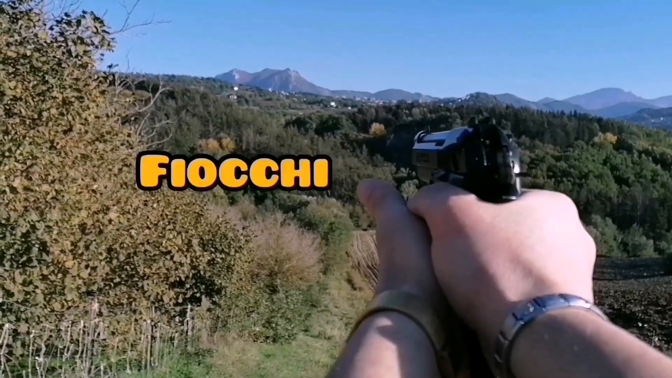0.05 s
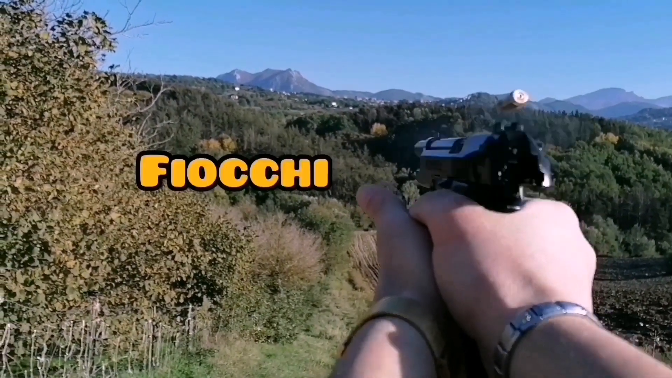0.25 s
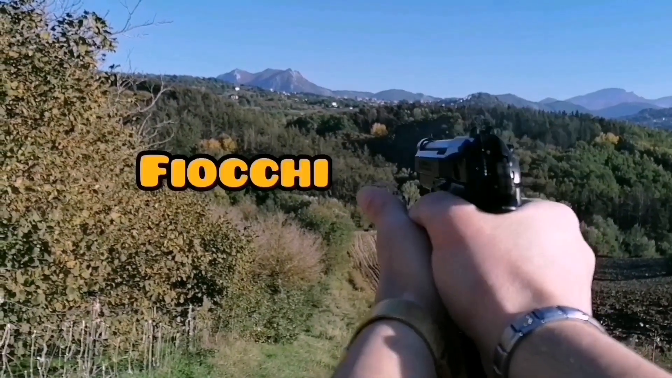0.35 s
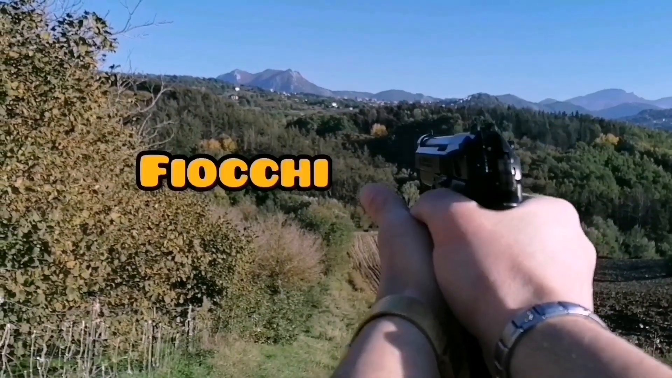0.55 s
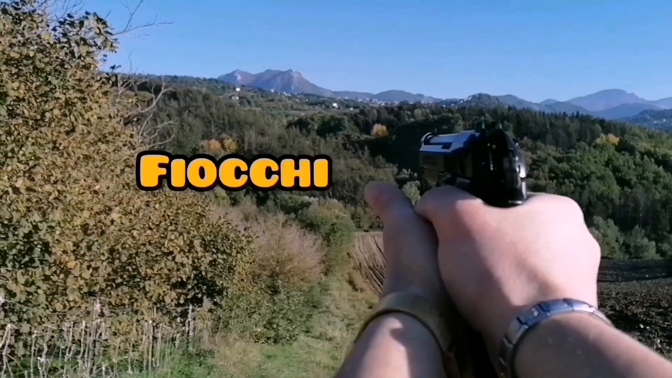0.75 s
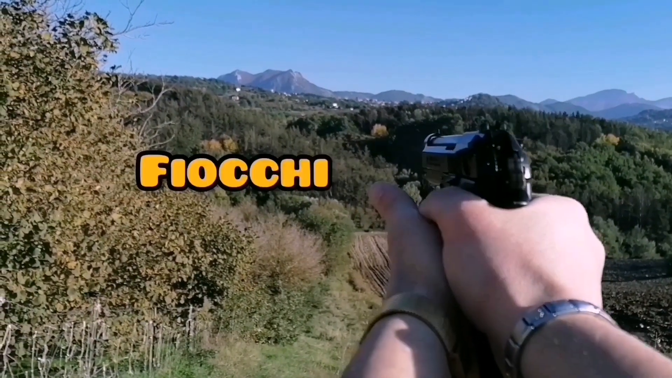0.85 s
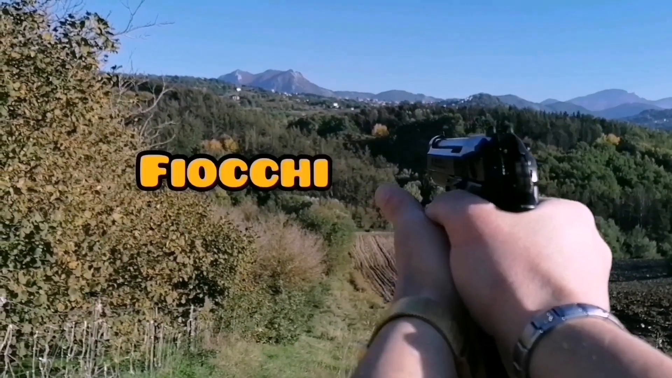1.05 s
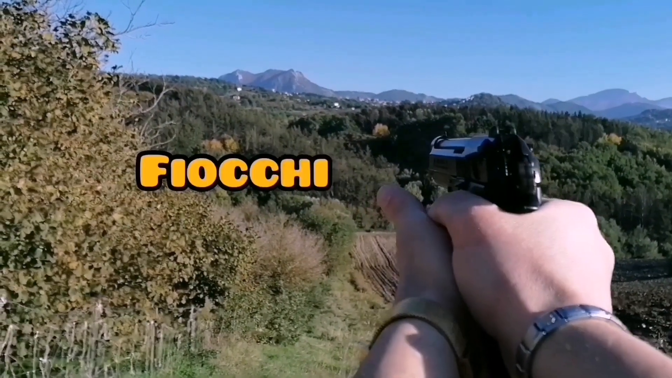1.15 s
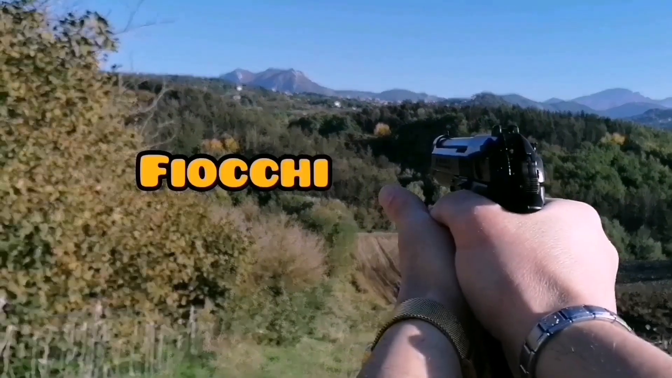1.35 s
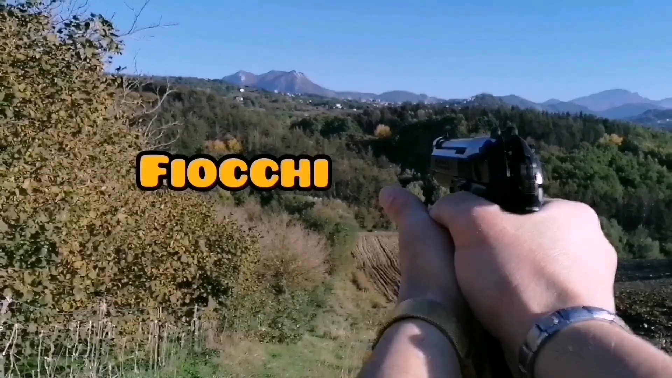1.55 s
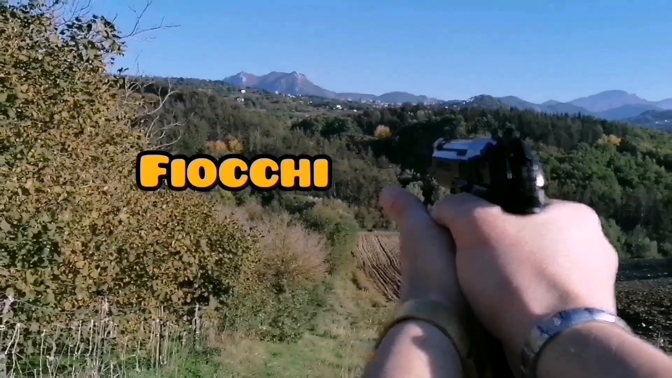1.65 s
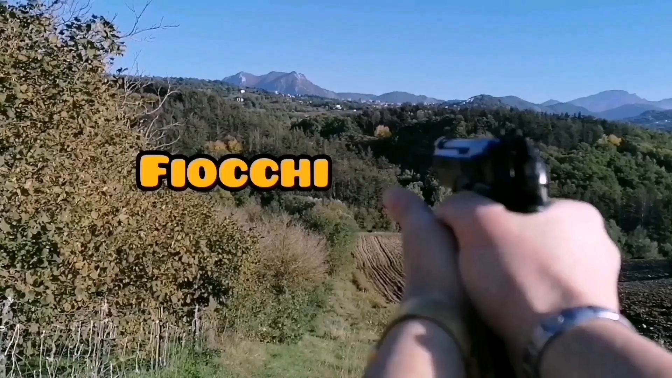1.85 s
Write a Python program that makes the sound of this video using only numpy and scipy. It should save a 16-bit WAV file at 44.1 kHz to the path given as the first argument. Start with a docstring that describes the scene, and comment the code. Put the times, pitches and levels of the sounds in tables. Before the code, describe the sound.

After a brief quiet outdoor hush, a single blank pistol shot bangs close to an overloaded stereo microphone, followed at once by a metal slide clack, fading hillside echoes, and a small case ticking onto stone in grass.

```python
"""A blank pistol is fired once on an open hillside: band-shaped gas noise, low decaying tones and a slow thud,
close to a small stereo recorder that it overloads. The slide rasps and rings; the spent case is a thin
throbbing tone that ends in grass and on a stone. Bushes, trees and slopes return scattered pulses and
echoes, mostly duller with distance; a far ridge begins to answer at the end. Rumble, wind and hum lie under.
"""
import sys
import numpy as np
from scipy import signal
from scipy.io import wavfile

SR = 44100
rng = np.random.default_rng(int(sys.argv[2]) if len(sys.argv) > 2 else 0)


def gain_from_decibels(decibels):
    """Convert decibel values to linear amplitude factors."""
    exponent = np.asarray(decibels, float) / 20
    return 10 ** exponent


def log_audio(samples):
    """Write samples as a 16-bit WAV file to the path given in sys.argv[1]."""
    # one column per channel
    frames = np.atleast_2d(samples).T
    # limit to full scale, then quantise
    limited = np.clip(frames, -1, 1)
    pcm = np.round(limited * 32767).astype(np.int16)
    wavfile.write(sys.argv[1], SR, pcm)


N = 83790
T = np.arange(N) / SR

# Spectrum of the gas roar: frequency_hz, relative_density_db (per Hz)
BLAST_SPECTRUM = [(90, -31), (200, -6), (350, -1.5), (620, -4), (900, -6), (1600, -18), (4000, -20.5),
                  (12000, -30)]
# Left-right correlation of roar and slide: frequency_hz, likeness (-1 to 1)
BLAST_LIKENESS = [(50, 0.37), (90, 0.029), (200, 0.83), (600, 0.61), (1200, 0.067), (4000, 0.076)]
# Low decaying tones that colour the bang: frequency_hz, level_db, t60_s
BOOM_TONES = [(44.9, -3.5, .04), (204, -0.5, 0.18), (350.9, 4.5, 0.096), (618.6, 5.5, .1), (752.7, 2, .1),
              (839.6, 6, 0.11)]
# Spectrum scattered by near bushes: frequency_hz, relative_density_db (per Hz)
BUSH_SPECTRUM = [(1500, -15.5), (3000, -4.5), (5000, -5), (8000, -4.5), (12000, -15), (14500, -45.5)]
# Spectrum of the slide's rasp: frequency_hz, relative_density_db (per Hz)
SLIDE_SPECTRUM = [(1200, -4.5), (2800, -0.5), (4500, -1.5), (7000, -6.5), (11000, -10.5), (15500, -19)]
# Modes of the slide's steel: frequency_hz, level_db, t60_s, left_minus_right_db
SLIDE_MODES = [(3102, -1.5, 0.018, -2), (4036, -3.5, 0.058, 11.5), (5820, -11.5, 0.075, -6.5),
               (6300, -8.5, .05, 4)]
# Modes of the case on the stone: frequency_hz, relative_level_db, t60_s (before the strike envelope),
# left_minus_right_db
LANDING_MODES = [(2970, -4.5, 0.003, -19.5), (4920, -5, .0034, 9), (5420, 0.5, 0.0037, 9.5),
                 (9670, -4, .0042, -4), (10910, -7.5, 0.0026, -17), (12540, -17.5, .0035, 1)]
# Faint ticks nearby: start_s, level_db (before the envelope), centre_hz, left_minus_right_db
TICKS = [(1.143, -44, 8000, 0), (1.355, -50, 6000, 0), (1.722, -46, 5000, 1), (1.8716, -46, 6500, 0)]
# Scattered return: time_s, level_db, air_loss_db (at 8 kHz; below 0 counts as 0), left_minus_right_db
HILLSIDE_RETURN = [(.28, -18.5, -17, 12), (0.308, -11.5, -2, 2.5), (.37, -20, -39, 3), (.44, -23, -6, 3),
                   (.5, -20.5, 10, 2.5), (0.581, -21.5, 5, 0.5), (0.669, -21.5, 19, 1.5),
                   (0.709, -29, 15, 3.5), (0.802, -28, 23, 7), (0.902, -29, 40, 9.5), (0.999, -32.5, 23, 8),
                   (1.099, -32.5, 36.5, 4), (1.22, -30.5, 55.5, 12), (1.32, -40, 38.5, 10.5),
                   (1.48, -41, 58, 11.5), (1.68, -49, 26, 9.5), (1.77, -42, 18.5, 10), (1.9, -33, 24.5, -1)]
# Spectrum of the return before air loss: frequency_hz, relative_density_db (per Hz)
RETURN_SPECTRUM = [(60, -28), (120, -14), (250, -9.5), (450, -5), (800, 2), (1200, 0), (1700, -6),
                   (2600, -12), (3200, -16.5), (6000, -21), (9000, -32), (13500, -49), (15500, -59)]
# Left-right correlation of hillside and bushes: frequency_hz, likeness (-1 to 1)
RETURN_LIKENESS = [(60, .7), (200, .8), (600, .65), (1500, .5), (4000, .3), (12000, .1)]
# Single echoes, and the low knock of the tick at 1.87 s:
# onset_s (one half-width before the peak), envelope_peak_db, pitch_hz, half_width_cycles
ECHOES_AND_KNOCK = [(.306, -25, 95, 1.1), (.320, -7, 826, 1.5), (.365, -27, 155, 1.5),
                    (.377, -14, 750, 1.6), (.385, -30, 125, 1.5), (.411, -21, 840, 2.2),
                    (.455, -17, 1130, 3.0), (.4765, -7, 1140, .9), (.494, -29, 108, 1.5),
                    (.4945, -14, 780, 1.8), (.497, -29, 220, 2.0), (.506, -16, 800, 1.3),
                    (.578, -20, 800, 2.5), (.630, -23, 500, 2.2), (.654, -21.5, 993, 2.2),
                    (.723, -26, 1100, 1.5), (.770, -33, 300, 2.5), (.954, -30, 1030, 2.5),
                    (1.294, -36, 700, 2.2), (1.801, -34, 453, 1.2), (1.813, -36.5, 600, 1.6),
                    (1.824, -32, 440, 1.1), (1.8707, -30.5, 2050, 1.3), (1.8725, -28, 600, 1.4)]
# Spectrum of the far rumble and hiss: frequency_hz, relative_density_db (per Hz)
RUMBLE_SPECTRUM = [(59, -45.5), (100, -19.5), (209, -15), (306, -11), (340, -3), (362, -3.5), (456, -6),
                   (575, -9.5), (995, -5.5), (1910, -21.5), (2460, -24.5), (15400, -45.5)]
# Left-right correlation of the rumble: frequency_hz, likeness (-1 to 1)
RUMBLE_LIKENESS = [(60, 0.89), (240, 0.97), (950, 0.66), (3770, -0.24), (15000, 0.28)]
# Wind on the ports, before its random lumps: time_s, level_db
WIND_LEVEL = [(0.0, -50), (0.12, -53.5), (0.28, -33), (0.36, -49), (1.492, -50), (1.9, -57)]

SHOT_S = .2253
AIR_LOSS_POWER = 0.82   # exponent of frequency in the air's absorption


def lead_hiss():
    """Band-limited noise: a two-sided exponential swells just ahead of the bang and falls just after."""
    efold_s, level_db, band_hz = 0.0015, -0.5, (700, 6000)
    hiss = rms_one(band_pass(rng.standard_normal((2, N)), band_hz))
    return gain_from_decibels(level_db) * hiss * np.exp(-np.abs(T - SHOT_S) / efold_s)


def gas_roar():
    """Turbulent jet noise: the gas leaving the barrel gives a broad spectrum with an exponential decay."""
    level_db, rise_s, t60_s = 11, 0.0011, 0.13
    return gain_from_decibels(level_db) * banded(white(), BLAST_SPECTRUM, BLAST_LIKENESS) * burst(SHOT_S, rise_s, t60_s)


def booms():
    """Additive synthesis: low damped sinusoids all start with the bang."""
    return sum(gain_from_decibels(db) * ring(SHOT_S, hz, t60) for hz, db, t60 in BOOM_TONES)


def ground_thump():
    """Ground response: the earth answers with a slower, low band of noise."""
    band_hz, likeness = (148.4, 360), 0.69
    level_db, rise_s, t60_s = -1, 0.018, 0.25
    return gain_from_decibels(level_db) * partly_alike(band_hz, likeness) * burst(SHOT_S, rise_s, t60_s)


def bushes():
    """Scattering with absorption: near bushes return treble, dulled in the air as the path lengthens."""
    level_db, pan_db = -12, 1.5
    rise_s, t60_s = 0.0042, 0.65   # t60 before air loss
    loss_db_per_s = 34   # at 8 kHz
    loss_db = loss_db_per_s * np.maximum(T - SHOT_S, 0)
    scatter = banded(white(), BUSH_SPECTRUM, RETURN_LIKENESS, loss_db=loss_db)
    return gain_from_decibels(level_db) * scatter * panned(burst(SHOT_S, rise_s, t60_s), pan_db)


def shot():
    """Superposition of the direct blast, the ground's answer and the scatter from the bushes."""
    return lead_hiss() + gas_roar() + booms() + ground_thump() + bushes()


def slide():
    """Friction, then impact: a bright rasp as the slide runs home, and steel modes as it slams shut."""
    start_s, rise_s, hold_s, t60_s, level_db = 0.2455, 0.032, 0.019, 0.13, -1
    hit_s = .276
    rise = np.clip((T - start_s) / rise_s, 0, 1)
    # The fall begins hold_s after the start, while the rise is still under way.
    fall = gain_from_decibels(-60 * np.maximum(T - start_s - hold_s, 0) / t60_s)
    rasp = gain_from_decibels(level_db) * banded(white(), SLIDE_SPECTRUM, BLAST_LIKENESS) * rise * fall
    steel = sum(panned(gain_from_decibels(db) * ring(hit_s, hz, t60), pan_db) for hz, db, t60, pan_db in SLIDE_MODES)
    return rasp + steel


def flying_case():
    """Modulated free vibration: one thin mode throbs as the case tumbles, until the grass damps it."""
    start_s, pitch_hz, level_db, t60_s, pan_db = .3, 5970, -39, 1.05, -8
    throb_db, throb_rate_hz = 3, 30   # random throb: spread and corner frequency
    stop_s, damping_s = .935, 0.018
    tumble = gain_from_decibels(throb_db * drift(throb_rate_hz))
    damping = np.clip((stop_s - T) / damping_s, 0, 1)
    return panned(gain_from_decibels(level_db) * ring(start_s, pitch_hz, t60_s) * tumble * damping, pan_db)


def dry_grass():
    """Friction noise: a flickering band rustles as the case drops through dry grass."""
    start_s, band_hz, likeness = .91, (2836, 4930), 0.33
    level_db, rise_s, t60_s = -52, 0.012, 1.46
    flicker = gain_from_decibels(level_db + 2.0 * drift(40))
    return partly_alike(band_hz, likeness) * burst(start_s, rise_s, t60_s) * flicker


def case_landing():
    """Impact excitation: the case hits a stone and several short modes ring."""
    hit_s, level_db = .97995, -10
    # Squaring softens the onset and halves this envelope's 1 s t60.
    strike = burst(hit_s, 0.00035, 1) ** 2
    return sum(panned(gain_from_decibels(level_db + db) * ring(hit_s, hz, t60) * strike, pan_db)
               for hz, db, t60, pan_db in LANDING_MODES)


def ticks():
    """Transient noise: each faint tick is a short band-limited puff."""
    rise_s, t60_s, half_band_octaves = 0.00058, .015, .6
    out = 0
    for s, db, hz, pan_db in TICKS:
        band_hz = [hz * 2 ** -half_band_octaves, hz * 2 ** half_band_octaves]
        noise = rms_one(band_pass(rng.standard_normal((2, N)), band_hz))
        out = out + noise * panned(gain_from_decibels(db) * burst(s, rise_s, t60_s), pan_db)
    return out


def slope_scatter(level_db, loss_db):
    """Diffuse reflection: thousands of random pulses of uneven size lose treble in the air."""
    pulses_per_s, spread_db, patchy_db = 4000, 3.0, 1.2
    lumps_db, lumps_rate_hz, rise_s = 1.5, 45, .02
    excess_db = spread_db * np.minimum(rng.exponential(1, (2, 2, N)), 5)
    sizes = gain_from_decibels(excess_db) * rng.choice([-1, 1], (2, 2, N))
    pulses = sizes * (rng.random((2, 2, N)) < pulses_per_s / SR) + 1e-18
    field = banded(pulses, RETURN_SPECTRUM, RETURN_LIKENESS, patchy_db, np.maximum(loss_db, 0))
    lumpy = gain_from_decibels(level_db + lumps_db * drift(lumps_rate_hz))
    return field * lumpy * np.clip((T - SHOT_S) / rise_s, 0, 1)


def echoes_and_knock():
    """Enveloped sinusoids: each echo or knock is a tone packet that rises faster than it falls."""
    packets = 0
    for s, db, hz, width in ECHOES_AND_KNOCK:
        cycles = (T - s) * hz - width   # zero at the envelope's peak
        steepness = np.where(cycles < 0, 2, 1)
        envelope = np.exp(-steepness * (cycles / width) ** 2)
        packets = packets + gain_from_decibels(db) * np.sin(2 * np.pi * cycles) * envelope
    return packets


def from_left(x):
    """Time-difference stereo: the right capsule hears the sound slightly later."""
    left_lead_s = .00044
    return np.array([x[0], np.interp(T - left_lead_s, T, x[1])])


def hillside():
    """Reflection from open ground: scatter and tone packets share one moving left-right balance."""
    s, *columns = np.transpose(HILLSIDE_RETURN)
    level_db, loss_db, pan_db = [np.interp(T, s, c) for c in columns]
    field = slope_scatter(level_db, loss_db)
    return from_left(field * panned(1, pan_db)) + panned(echoes_and_knock(), pan_db)


def far_rumble():
    """Stationary noise with a slow trend: far rumble and hiss flicker by band and gradually ease."""
    start_db, eases_db_per_s, patchy_db = -43, 2.5, 1.0
    rumble = banded(white(), RUMBLE_SPECTRUM, RUMBLE_LIKENESS, patchy_db)
    return gain_from_decibels(start_db - eases_db_per_s * T) * rumble


def wind():
    """Pressure turbulence: low, lumpy noise of wind on the ports, shared in part by the capsules."""
    band_hz, likeness = (28.1, 92), 0.4
    lumps_db, lumps_rate_hz = 4, 10
    level_db = np.interp(T, *np.transpose(WIND_LEVEL)) + lumps_db * drift(lumps_rate_hz)
    return gain_from_decibels(level_db) * partly_alike(band_hz, likeness)


def distant_hum():
    """Random amplitude and phase modulation: a faint low tone wavers."""
    pitch_hz, level_db, waver_rate_hz = 205, -55.5, 16
    level = gain_from_decibels(level_db + 1.9 * drift(waver_rate_hz))   # wander in dB
    phase = 1.2 * drift(waver_rate_hz)   # wander in radians
    return level * np.sin(2 * np.pi * pitch_hz * T + phase)


def countryside():
    """Superposition of the steady background: rumble, wind and hum."""
    return far_rumble() + wind() + distant_hum()


def white():
    """Flat spectrum: two pairs of unrelated noises."""
    return rng.standard_normal((2, 2, N))


def banded(source, spectrum, likeness, patchy_db=0, loss_db=0):
    """Third-octave synthesis: mid and side noise get a level, correlation, flicker and air loss by band."""
    out, plain = 0, 0
    edges = 33 * 2 ** (np.arange(28) / 3)   # Hz
    for k, (low, high) in enumerate(zip(edges, edges[1:])):
        mid, side = band_pass(source[k % 2], [low, high])   # neighbouring bands use unrelated pairs
        hz = np.sqrt(low * high)
        alike = at_hz(likeness, hz)
        stereo = np.sqrt(1 + alike) * mid + np.sqrt(1 - alike) * side * [[1], [-1]]
        band = gain_from_decibels(at_hz(spectrum, hz)) * stereo
        plain = plain + band
        out = out + band * gain_from_decibels(patchy_db * drift(10) - loss_db * (hz / 8000) ** AIR_LOSS_POWER)
    return out / np.sqrt(np.mean(plain ** 2))   # rms 1 before flicker and air loss


def partly_alike(hz, likeness):
    """Partial coherence: the two capsules share only part of a noise band."""
    shared, left, right = rms_one(band_pass(rng.standard_normal((3, N)), hz))
    return np.sqrt(likeness) * shared + np.sqrt(1 - likeness) * np.array([left, right])


def band_pass(x, hz):
    """Linear filtering: a Butterworth band-pass settles on a run-in taken from the signal's end."""
    sos = signal.butter(2, hz, "band", fs=SR, output="sos")
    return signal.sosfilt(sos, np.concatenate([x[..., -4000:], x], axis=-1))[..., 4000:]


def burst(start, rise, t60):
    """Exponential energy build-up and decay: a smooth rise, then a fall of 60 dB per t60."""
    age = np.maximum(T - start, 0)
    return (1 - np.exp(-age / rise)) * 1000. ** (-age / t60)


def ring(s, hz, t60):
    """Damped oscillation: a sinusoid that starts at time s and falls 60 dB per t60."""
    age = np.maximum(T - s, 0)
    return np.sin(2 * np.pi * hz * age) * 1000. ** (-age / t60)


def drift(rate):
    """Low-passed random process: a slow wander of spread 1, with its corner at rate in Hz."""
    step = 40   # samples between the points of the wander
    r = np.exp(-2 * step * np.pi * rate / SR)
    noise = rng.standard_normal(N // step + 2002)
    slow = signal.lfilter([1], [1, -2 * r, r * r], noise)[2000:]
    return np.interp(np.arange(N) / step, np.arange(len(slow)), rms_one(slow))


def rms_one(x):
    """Normalisation of power: scale to rms 1."""
    return x / np.sqrt(np.mean(x ** 2) + 1e-20)


def at_hz(points, hz):
    """Interpolation on a logarithmic frequency axis."""
    table_hz, values = np.transpose(points)
    return np.interp(np.log(hz), np.log(table_hz), values)


def panned(x, pan_db):
    """Level-difference stereo: split into left and right, pan_db apart."""
    return np.array([x * gain_from_decibels(pan_db / 2), x * gain_from_decibels(-pan_db / 2)])


def scene():
    """Linear superposition of all sources at the two capsules."""
    return shot() + slide() + flying_case() + dry_grass() + case_landing() + ticks() + hillside() + countryside()


def roll_off(x):
    """The treble ends steeply here."""
    return signal.sosfilt(signal.butter(12, 15570, fs=SR, output="sos"), x)


def record(dry):
    """Amplitude saturation: the overloaded input stage clips hard towards its ceiling."""
    ceiling, knee = 1.03, 3.3   # a larger knee bends more sharply
    clipped = dry / (1 + np.abs(dry / ceiling) ** (2 * knee)) ** (.5 / knee)
    return roll_off(clipped)


dry = scene()
out = record(dry)
log_audio(out)
```